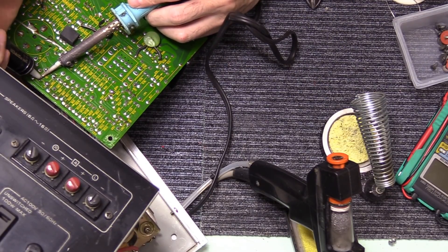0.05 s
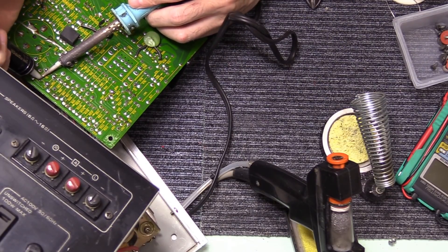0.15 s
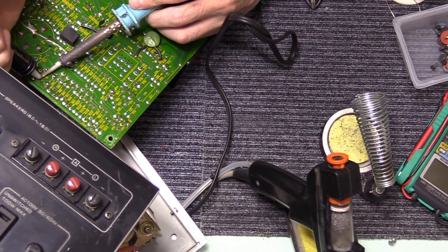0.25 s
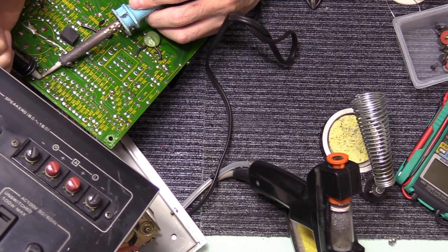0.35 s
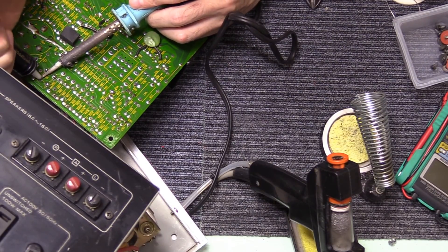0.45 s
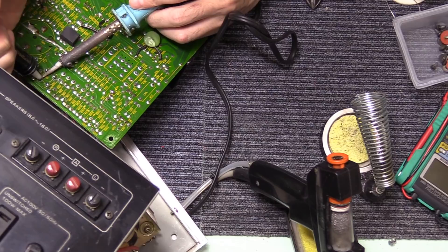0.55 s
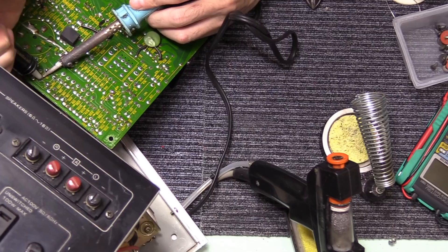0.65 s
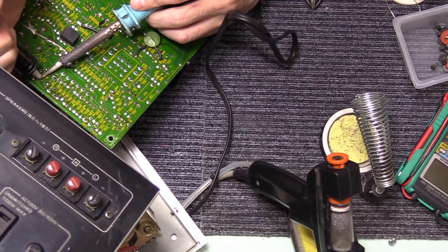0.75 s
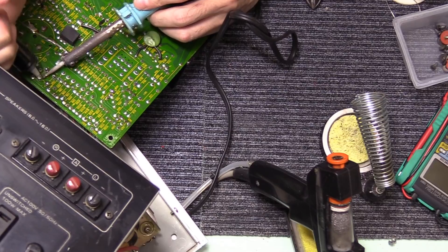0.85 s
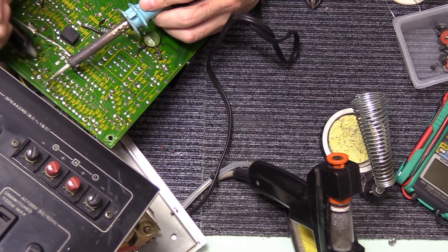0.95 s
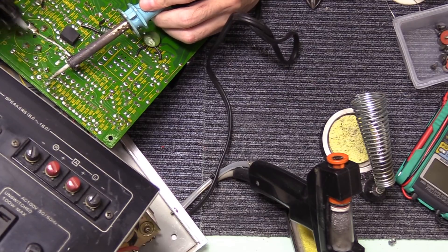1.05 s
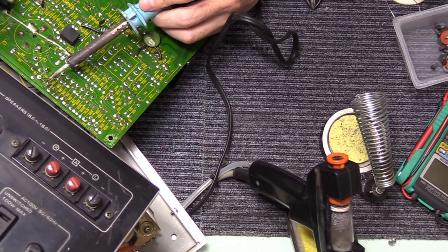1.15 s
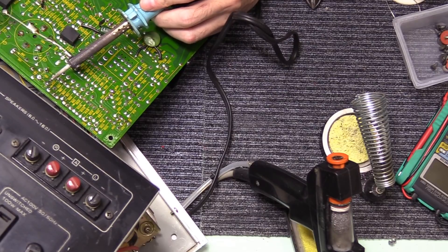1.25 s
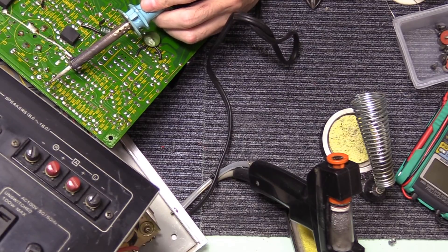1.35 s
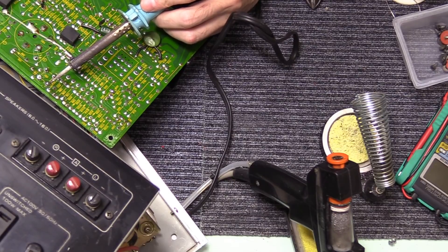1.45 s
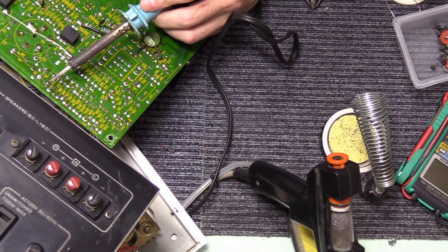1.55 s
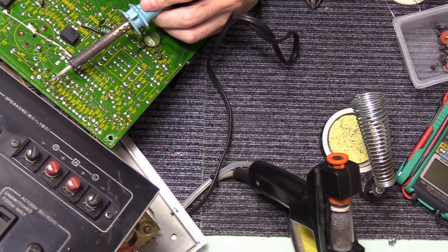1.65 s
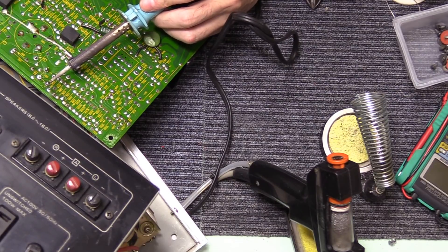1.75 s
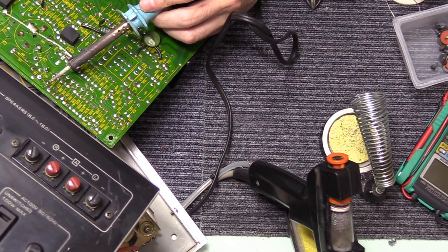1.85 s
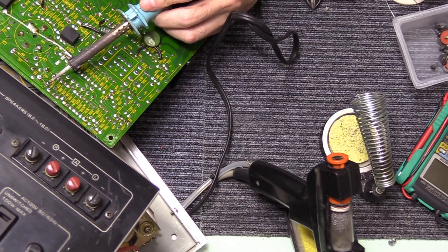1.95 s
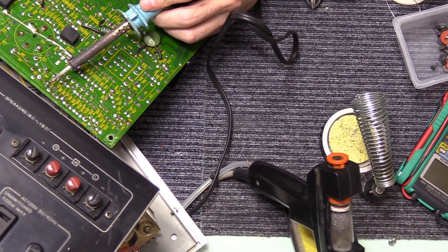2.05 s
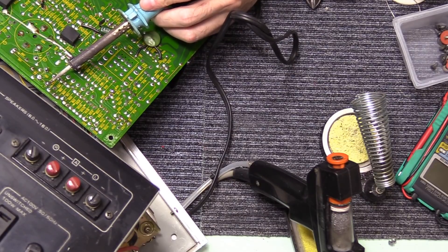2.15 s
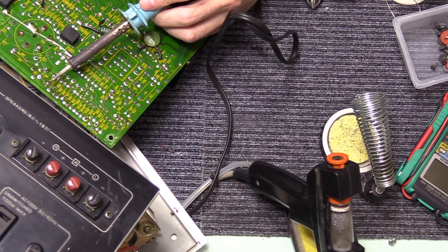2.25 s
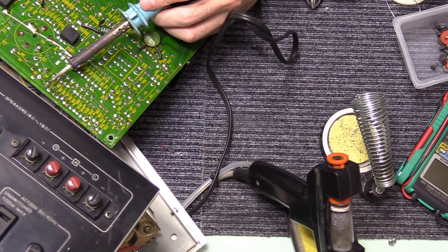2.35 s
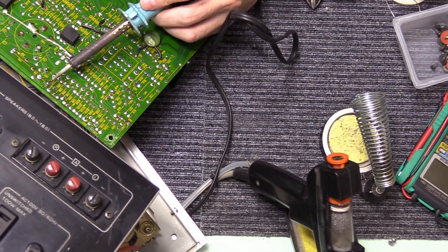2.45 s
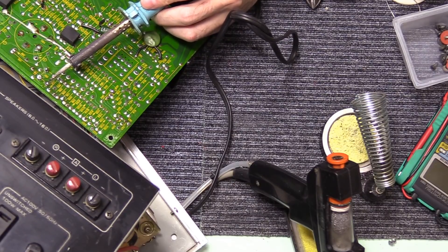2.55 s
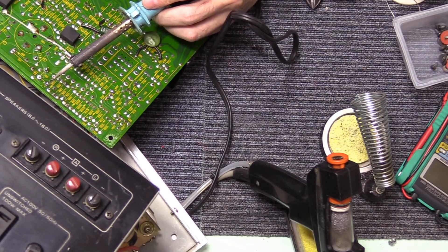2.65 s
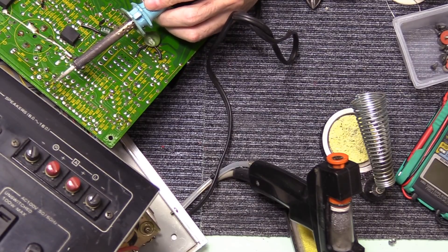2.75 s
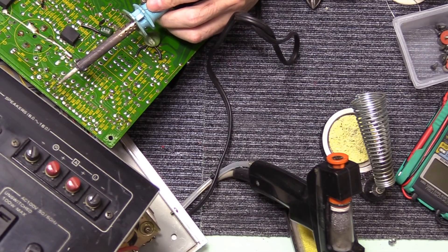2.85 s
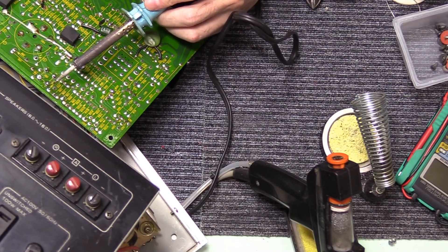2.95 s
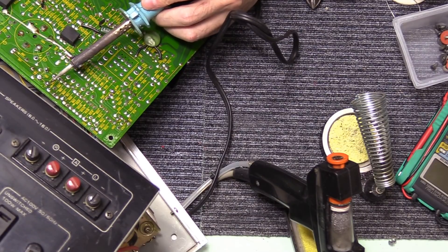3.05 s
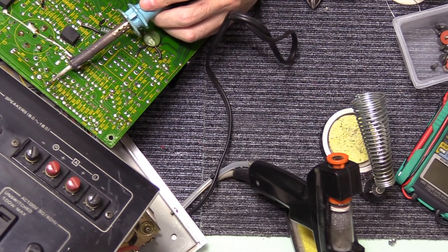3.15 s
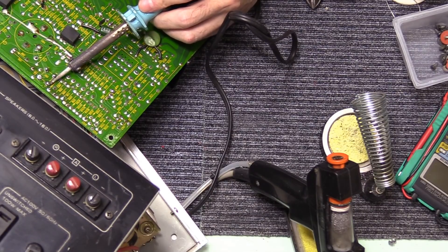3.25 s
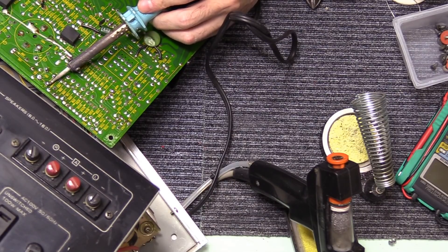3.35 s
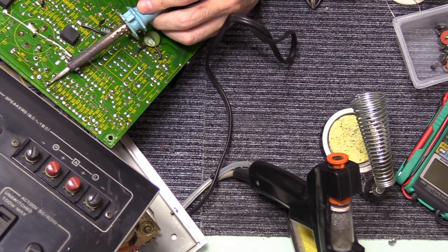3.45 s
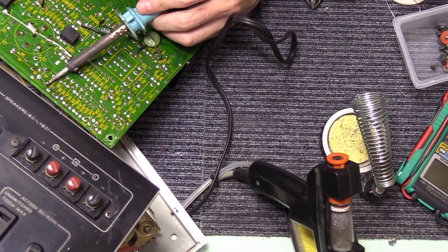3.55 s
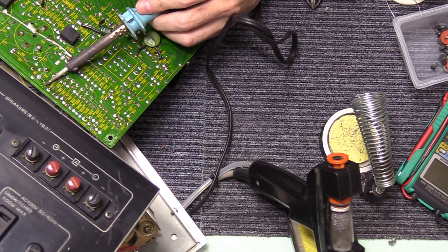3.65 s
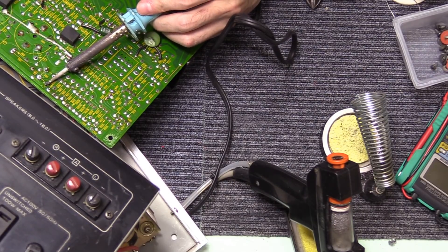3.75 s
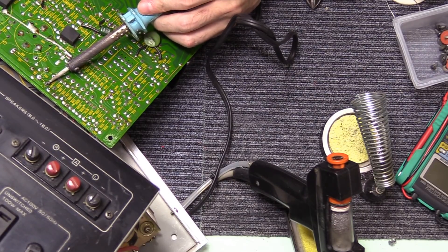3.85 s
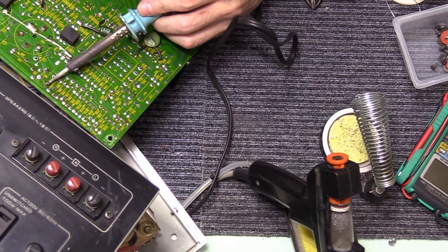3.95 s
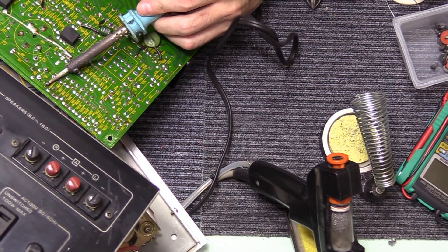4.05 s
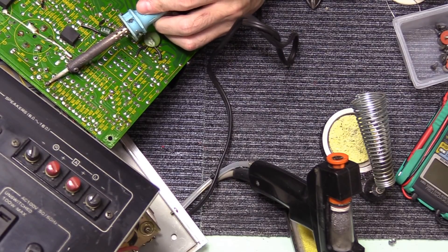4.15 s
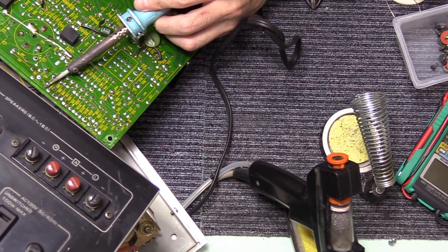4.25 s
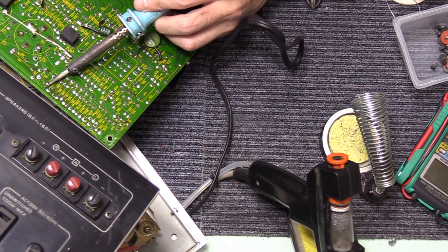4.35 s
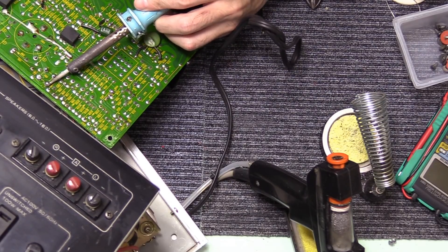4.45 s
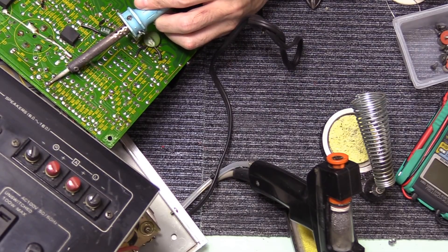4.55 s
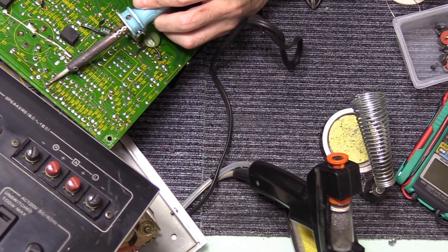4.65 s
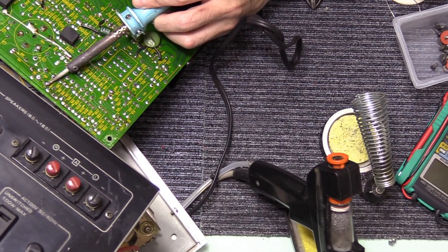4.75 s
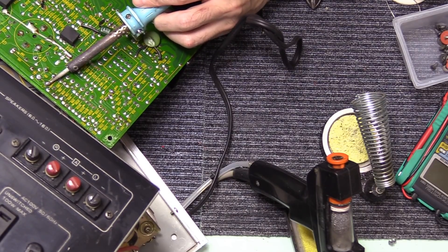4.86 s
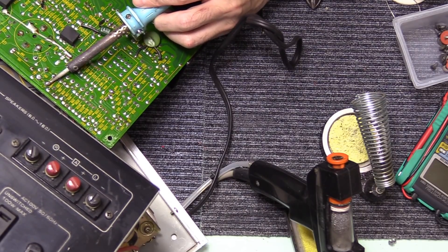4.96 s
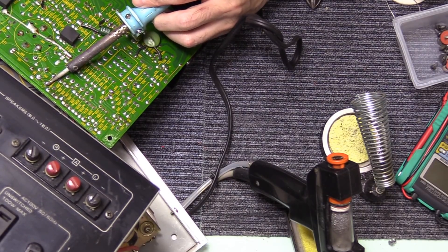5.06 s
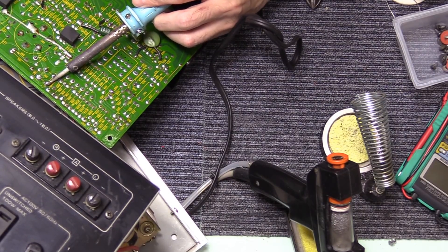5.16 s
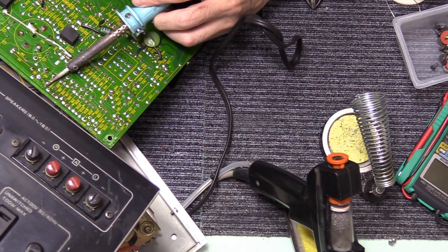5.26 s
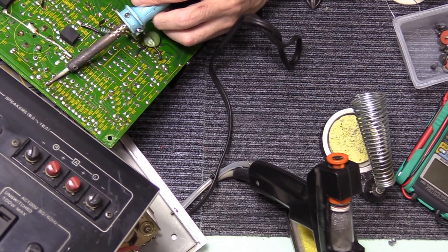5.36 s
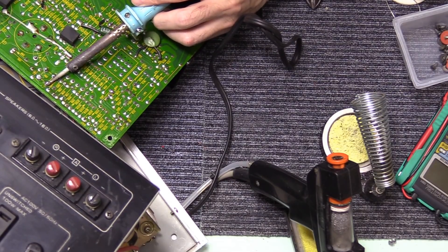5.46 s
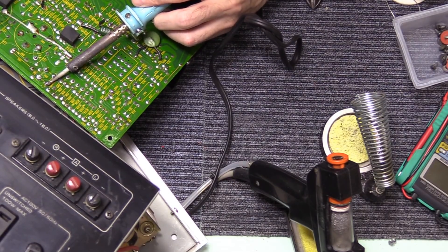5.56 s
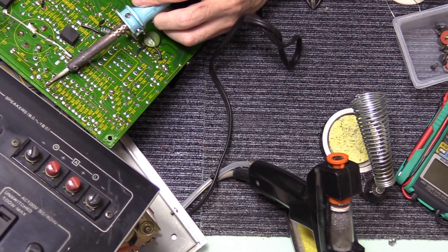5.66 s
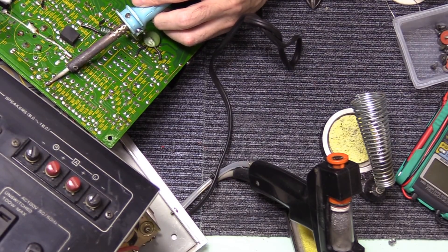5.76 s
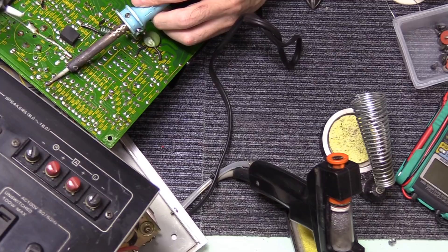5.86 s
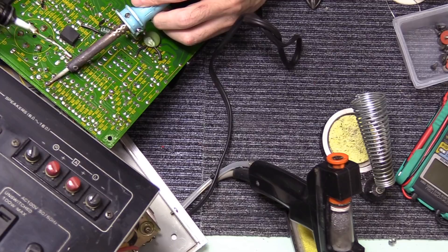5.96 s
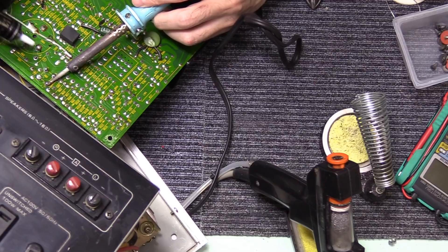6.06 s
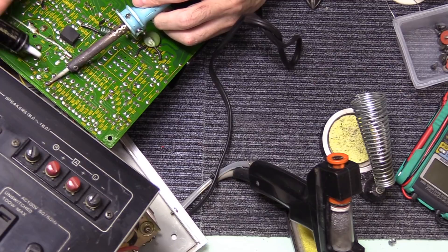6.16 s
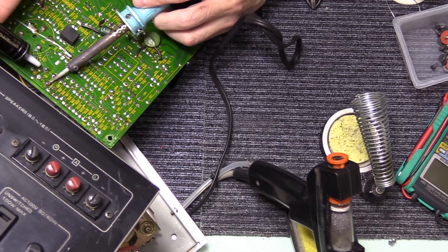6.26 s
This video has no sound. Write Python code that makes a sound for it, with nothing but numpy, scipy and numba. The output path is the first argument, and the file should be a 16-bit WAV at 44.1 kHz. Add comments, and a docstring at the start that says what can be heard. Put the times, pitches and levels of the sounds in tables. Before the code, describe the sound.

At a workbench, small ticks lead to a very loud, sharp snap of a spring-loaded solder pump on a circuit board, with a brief rattle and low bench thump. Faint rubbing and ticks follow, then the plunger is pushed back to a crisp latch click and a small part is set down. Light board knocks and a double iron tap come later. Close microphone, small damped room, low hum and hiss.

```python
"""A spring-loaded solder pump snaps over a circuit board, is later pushed back until it latches; hands and tools work on.
Pump, latch, board, loose part and iron tip are struck banks of decaying modes; the spring rattle is shaped noise.
Ticks are noise pings with a bright crack; rubs and squeaks are resonant noise under swells.
A short damped room answers the handled sounds. Bench boom, transformer and fan tones, and air noise are added dry."""
import sys
import numpy as np
from scipy import signal
from scipy.fft import rfft, irfft, next_fast_len
from scipy.io import wavfile
from scipy.ndimage import uniform_filter1d
from numba import njit

SR = 44100
rng = np.random.default_rng(int(sys.argv[2]) if len(sys.argv) > 2 else 0)


def persist_wave(psi):
    """Save psi, clipped to +-1, as 16-bit WAV."""
    counts = np.round(np.clip(psi, -1, 1) * 32767).astype(np.int16)
    wavfile.write(sys.argv[1], SR, np.atleast_2d(counts).T)


N = 278737  # samples


def undb(db):
    """Amplitude factor of a level in dB."""
    return 10 ** (np.asarray(db) / 20)


def level(x, rms_db):
    """Scale to an rms level."""
    return x * undb(rms_db) / np.sqrt(np.mean(x ** 2))


@njit
def svf(x, hz, width_hz):
    """State-variable band-pass with moving centre, gain 1 at the centre."""
    y, band_state, low_state = np.empty(len(x)), 0., 0.
    for i in range(len(x)):
        g = np.tan(np.pi * hz[i] / SR)
        k = width_hz / hz[i]
        v = (band_state + g * (x[i] - low_state)) / (1 + g * (g + k))
        band_state = 2 * v - band_state
        low_state = low_state + 2 * g * v
        y[i] = k * v
    return y


def band(n, hz, width_hz):
    """Noise through a resonance applied twice, rms 1."""
    centre_hz = np.clip(hz, 20, .44 * SR) * np.ones(n)
    once = svf(rng.standard_normal(n), centre_hz, 1. * width_hz)
    return level(svf(once, centre_hz, 1. * width_hz), 0)


def walk(rate_hz):
    """Random levels held 1 / rate_hz and slewed twice; spread near 1."""
    k = int(SR / rate_hz)
    steps = np.repeat(rng.standard_normal(N // k + 1), k)
    return 1.1 * uniform_filter1d(uniform_filter1d(steps, k), k)[:N]


def fade(t, t60_s):
    """Exponential decay, 60 dB down at t60_s (2 ms at least)."""
    return np.exp(-np.log(1000) * t / np.maximum(t60_s, .002))


def add(out, start_s, x, pan_db=0):
    """Mix a sound in; pan_db is left minus right."""
    i = int(start_s * SR)
    sides = undb(np.array([[pan_db], [-pan_db]]) / 2)
    out[:, i:i + x.shape[-1]] += (sides * x)[:, :N - i]


def ring(modes, focus_hz=1000, octaves=np.inf, stretch=1, contact_s=.00066, count=22):
    """One blow on modes, strongest around a focus; each mode is close partials in chance phases. Peak 1."""
    hz, width_hz, db, t60_s = np.repeat(modes, count, axis=0).T[:, :, None]
    t = np.arange(int(SR * np.max(t60_s) * stretch)) / SR
    place, phase = rng.random((2, len(hz), 1))
    rank = (np.arange(len(hz))[:, None] % count + place) / count
    spread = np.arctanh(.98 * (2 * rank - 1)) / 2  # dense at the centre, thin skirts
    hz = np.clip(hz + width_hz * spread, 20, .45 * SR)
    gain = undb(db - 7.9 * (np.log2(hz / focus_hz) / octaves) ** 2)
    decay = gain * fade(t, t60_s * stretch)
    partials = decay * np.sin(2 * np.pi * (hz * t + phase))
    bunch = partials.reshape(len(modes), count, -1).sum(axis=1)
    full = decay.reshape(len(modes), count, -1).sum(axis=1)
    share = np.sqrt(np.sum(full ** 2, axis=1) / np.sum(bunch ** 2, axis=1))  # undoes chance cancellation
    x = share @ bunch
    x *= np.sin(np.pi / 2 * np.minimum(t / contact_s, 1)) ** 2  # contact builds up
    return x / np.max(np.abs(x))


def strikes(blows, modes, contact_s=.00066):
    """Equal-spectrum blows on one object, slightly left."""
    out = np.zeros((2, N))
    for start_s, peak_db in blows:
        add(out, start_s, undb(peak_db) * ring(modes, contact_s=contact_s), 1.2)
    return out


# mains hum and fan tones: (pitch [Hz], rms level [dB], waver [dB])
HUM = [(101.7, -63, 1), (123.3, -65, 1), (206.5, -65, 5.5), (381, -63, -1.47), (894, -71.5, 0.5)]
# two fans at nearly the same speed beat slowly
FAN_PAIR_HZ, FAN_PAIR_DB, BEAT_PEAK_S = (48.34, 48.74), -74, 2.35  # level of each fan


def hum():
    """Transformer and fan tones, each wavering in level, plus a steady beating pair."""
    t = np.arange(N) / SR - BEAT_PEAK_S
    tones = sum(undb(db + waver_db * walk(11)) * np.cos(2 * np.pi * hz * t) for hz, db, waver_db in HUM)
    pair = sum(np.cos(2 * np.pi * hz * t) for hz in FAN_PAIR_HZ)
    return np.sqrt(2) * (tones + undb(FAN_PAIR_DB) * pair)


# air noise spectrum: (frequency [Hz], relative level [dB])
AIR_SPECTRUM = [(20, -27.5), (60, -20.5), (95, -8), (125, -6), (155, -11), (200, -8), (300, -5),
                (380, -4.5), (435, -10.5), (900, -13.5), (1090, -17), (1960, -25), (6000, -31),
                (15600, -39.5)]
# stereo width of the air: (frequency [Hz], side minus mid [dB])
AIR_SIDE = [(60, -14.5), (110, -8.5), (200, -13.5), (380, -12.5), (700, -6), (1290, -4), (2380, -4),
            (4400, -6.5), (8120, -6), (15000, -3)]
AIR_MID_RMS_DB = -54.5


def air():
    """Fan noise and microphone hiss: shaped noise, nearly the same left and right in the bass."""
    n = next_fast_len(N)
    log_hz = np.log(np.maximum(np.arange(n // 2 + 1) * SR / n, 1))
    shape_db, side_db = (np.interp(log_hz, np.log(np.array(c)[:, 0]), np.array(c)[:, 1])
                         for c in (AIR_SPECTRUM, AIR_SIDE))
    white = rfft(rng.standard_normal((2, n)))
    shaped = irfft(white * undb([shape_db, shape_db + side_db]), n)[:, :N]
    mid, side = shaped * undb(.5 * walk(2.316))  # slow level drift
    return np.array([mid + side, mid - side]) * undb(AIR_MID_RMS_DB) / np.std(mid)


# small ticks of tools and parts: (time [s], ping peak [dB], pitch [Hz], crack level before decay [dB], t60 [s])
TICKS = [(0.128, -53, 2340, -56.5, .028), (0.412, -48, 2660, -61, .035), (0.5441, -41.5, 2770, -54, 0.028),
         (.8174, -51, 3740, -52.5, 0.027), (1.3156, -38.5, 3700, -57, 0.013),
         (1.4892, -37, 3000, -48, 0.013), (1.5506, -37, 9600, -52, 0.011), (1.585, -53, 2620, -70, .012),
         (1.768, -57, 2440, -68, .023), (2.0623, -61, 8370, -49.5, 0.018), (2.4996, -53, 3940, -57, .02),
         (2.52, -50, 6550, -57, .029), (2.559, -34, 3860, -55, 0.014), (2.6737, -54, 2850, -54.5, 0.023),
         (2.746, -45, 7760, -53, 0.018), (3.3091, -42, 2660, -49.5, 0.035), (3.711, -58, 2320, -57, .025),
         (3.742, -51, 4520, -54, .035), (3.7674, -52.5, 8400, -66, .021), (3.952, -55, 2020, -61.5, 0.037),
         (4.2615, -46, 2920, -58, 0.034), (4.6097, -50.5, 3260, -57, 0.032),
         (4.6873, -43.5, 4500, -51, 0.031), (5.88, -53, 4360, -54, .021), (5.999, -49.5, 4280, -74, 0.037),
         (6.089, -47, 4270, -51, 0.029), (6.1477, -49.5, 4360, -60, .025), (6.191, -48, 2000, -60, 0.037)]
TICK_WIDTH_PER_S = 25  # bandwidth as share of pitch, per second of t60
TICK_RISE_S, TICK_PAN_DB = .0009, 0.6


def ticks():
    """Short noise ping around a pitch plus a bright crack; longer pings are broader."""
    out, t = np.zeros((2, N)), np.arange(SR // 12) / SR
    for start_s, peak_db, hz, crack_db, t60_s in TICKS:
        shape = np.minimum(t / TICK_RISE_S, 1) * fade(t, t60_s)
        ping = shape * band(len(t), hz, hz * TICK_WIDTH_PER_S * t60_s)
        ping = undb(peak_db) * ping / np.max(np.abs(ping))
        crack = undb(crack_db) * shape * band(len(t), 9000, 10000)
        add(out, start_s, ping + crack, TICK_PAN_DB)
    return out


# light knocks on the board, held down by a hand: (time [s], peak [dB], focus [Hz])
KNOCKS = [(.5447, -41, 917), (1.5857, -43, 1440), (3.3087, -33.5, 729), (4.6878, -35.5, 1160),
          (4.9137, -50, 1380), (6.087, -46, 1600)]
# circuit board modes: (frequency [Hz], width [Hz], level [dB], free t60 [s])
BOARD = [(241.3, 65, -5, 0.11), (323.8, 50.2, -6, 0.094), (399, 30, -7, .1), (483, 25, -1.5, 0.097),
         (548, 7, -3, 0.048), (653.5, 28, 1, .085), (743, 42, -6.5, 0.079), (870, 120, -8, .07),
         (1001, 120, -7, .07), (1224, 76, -14, 0.075), (1420, 152.4, -12, 0.033), (1640, 760, -10, 0.059)]
KNOCK_OCTAVES, KNOCK_T60_FACTOR = 0.42, .42  # focus spread, damping by the hand


def knocks():
    """Hand-damped board modes, excited narrowly around each knock's focus."""
    out = np.zeros((2, N))
    for start_s, peak_db, focus_hz in KNOCKS:
        x = ring(BOARD, focus_hz, KNOCK_OCTAVES, KNOCK_T60_FACTOR, count=3)
        add(out, start_s, undb(peak_db) * x, .8)
    return out


# jolts to the bench top: (time [s], level [dB])
JOLTS = [(.622, -31), (.632, -21), (4.281, -44.5)]
# bench top modes: (frequency [Hz], level [dB], t60 [s])
BENCH = [(58, -16, 0.23), (83.5, -2, .22), (117, 0, 0.29), (184.8, -11, 0.23)]
BOOM_RISE_S = 0.014


def boom():
    """The lowest bench modes swell late and stay, reaching the two microphones slightly out of step."""
    out, t = np.zeros((2, N)), np.arange(SR // 2) / SR
    phase_rad = np.array([[.13], [-.13]])
    for start_s, db in JOLTS:
        i = int(start_s * SR)
        for hz, mode_db, t60_s in BENCH:
            swing = np.sin(2 * np.pi * hz * t + phase_rad) * np.minimum(t / BOOM_RISE_S, 1)
            out[:, i:i + len(t)] += undb(db + mode_db) * fade(t, t60_s) * swing
    return out


# left minus right: the barrel's low ring leans left, its treble right
SNAP_PAN_DB, SNAP_TOP_PAN_DB, SNAP_SPLIT_HZ = 4.0, -3, 3500


def place_snap(x):
    """Pan lows and highs of the flying plunger to different sides."""
    low = signal.sosfilt(signal.butter(1, SNAP_SPLIT_HZ, fs=SR, output="sos"), x)
    sides = np.array([[.5], [-.5]])
    return undb(SNAP_PAN_DB * sides) * low + undb(SNAP_TOP_PAN_DB * sides) * (x - low)


RELEASE_S, FLIGHT_S = .6235, 0.0046
RATTLE_DB, RATTLE_RISE_S, RATTLE_T60_S = -21.5, .0015, 0.11


def spring_rattle():
    """Band noise held while the plunger flies up the barrel, then decaying as the spring rattles out."""
    out, t = np.zeros((2, N)), np.arange(SR // 6) / SR
    rise = np.minimum(t / RATTLE_RISE_S, 1) ** 2
    shape = rise * fade(np.maximum(t - FLIGHT_S, 0), RATTLE_T60_S)
    rattle = band(len(t), 8060, 9000)
    rattle = rattle + undb(-2.5) * band(len(t), 780, 1800)
    rattle = rattle + undb(-12.0) * band(len(t), 360, 450)
    add(out, RELEASE_S, place_snap(undb(RATTLE_DB) * shape * rattle))
    return out


# catch letting go, plunger hitting its stop, bounce: (time [s], pump peak before pan [dB], board peak [dB])
BLOWS = [(0.6257, -15.5, -17), (.6340, 0.5, -16.5), (0.6357, -5.5, -23.5)]
# barrel, rod and spring modes: (frequency [Hz], width [Hz], level [dB], t60 [s])
PUMP = [(1400, 350, -13.5, .03), (1830, 100, -1, 0.013), (2242, 330, -11, 0.018), (2850, 410, -9, 0.016),
        (3690, 530, -10, 0.023), (4440, 520, -7.5, 0.019), (5530, 900, -3, .015), (6720, 1000, -3.5, 0.011),
        (8400, 1500, 3.5, 0.0066), (10285, 900, -0.5, 0.0067), (11600, 1400, -5.5, 0.01),
        (13740, 2700, -7.5, 0.0069)]
BLOW_FOCUS_HZ, BLOW_OCTAVES, BOARD_FOCUS_HZ, BOARD_OCTAVES = 5000, 12, 550, 0.86


def pump_snap():
    """Each blow rings the pump's modes and those of the board under it."""
    out = np.zeros((2, N))
    for start_s, pump_db, board_db in BLOWS:
        pump = undb(pump_db) * ring(PUMP, BLOW_FOCUS_HZ, BLOW_OCTAVES)
        board = undb(board_db) * ring(BOARD, BOARD_FOCUS_HZ, BOARD_OCTAVES, count=3)
        add(out, start_s, place_snap(pump))
        add(out, start_s, board, .8)
    return out


# plunger sliding, hands rustling: (start [s], rise [s], fall [s], top level [dB], tilt [dB per octave])
RUBS = [(.805, .012, 0.044, -59, -11), (.86, 0.053, 0.16, -63, -3.5), (1.528, .008, 0.033, -60.5, 3),
        (1.57, 0.051, 0.25, -65.5, -7), (2.06, 0.012, 0.12, -62.5, -5.5), (2.19, 0.12, 0.1, -53, 0),
        (2.55, .004, .012, -52, 0), (2.92, 0.15, .12, -73.5, 3), (4.24, .025, .09, -67.5, -13.5),
        (4.688, 0.0045, 0.041, -65, -12), (5.019, 0.08, 0.2, -68.5, 2)]
# resonances of the rubbed barrel: (frequency [Hz], width [Hz], level [dB])
SLIDE = [(2000, 2400, -1), (4680, 2000, 3.5), (6660, 1500, 4), (8330, 2300, 4.5), (11540, 2000, -2.5),
         (13900, 1500, -20)]
RUB_BLUNT = 0.44  # under 1: comes and goes quickly around a broad top


def rubs():
    """Grainy sliding hiss: flickering noise bands in the barrel resonances under a blunt swell."""
    out = np.zeros((2, N))
    for start_s, rise_s, fall_s, top_db, tilt_db in RUBS:
        t = np.arange(0, rise_s + fall_s, 1 / SR)
        n = len(t)
        ramp = np.interp(t, [0, rise_s, rise_s + fall_s], [0, 1, 0])
        shape = np.sin(np.pi / 2 * ramp) ** RUB_BLUNT
        hiss = np.zeros(n)
        for hz, width_hz, peak_db in SLIDE:
            band_db = peak_db + tilt_db * np.log2(hz / 7000) + 2.3 * walk(26.5)[:n]
            hiss += undb(band_db) * band(n, hz, width_hz)
        hiss = level(hiss, -0.27) + undb(-6.5) * band(n, 8400, 10500)
        grain_db = 1.7 * walk(74.0)[:n]
        add(out, start_s, undb(top_db + grain_db) * hiss * shape)
    return out


# brief squeaks, narrow hisses: (start [s], length [s], pitch [Hz], level before swell [dB])
SQUEAKS = [(1.267, 0.031, 8300, -66), (1.356, .06, 6600, -67.5), (1.362, .055, 8800, -72),
           (1.499, 0.18, 2130, -71), (1.85, 0.055, 7800, -70), (3.214, 0.06, 2200, -66),
           (3.216, .16, 3800, -68), (3.36, 0.064, 2140, -69), (3.646, 0.04, 4280, -65.5),
           (3.728, 0.038, 2270, -66), (3.787, 0.03, 4500, -69), (3.86, .022, 4260, -67),
           (3.931, .028, 4200, -68), (5.803, 0.21, 4480, -71.5), (6.2, 0.11, 2120, -65.5)]
SQUEAK_WIDTH = .036  # share of pitch at 1 s length; shorter ones are broader


def squeaks():
    """Narrow noise bands under a smooth swell."""
    out = np.zeros((2, N))
    for start_s, length_s, hz, db in SQUEAKS:
        n = int(max(length_s, .005) * SR)
        hiss = band(n, hz, hz * SQUEAK_WIDTH / np.sqrt(length_s))
        add(out, start_s, undb(db) * hiss * signal.windows.tukey(n, .5))
    return out


# latch catching the plunger rod: (time [s], peak before pan [dB])
CATCH = [(2.3973, -10)]
# latch modes: (frequency [Hz], width [Hz], level [dB], t60 [s])
LATCH = [(1280, 230, -16, 0.011), (1610, 250, -10, 0.01), (1993, 310, 1.5, 0.014), (2142, 310, -1.5, 0.023),
         (2770, 330, -13, 0.011), (3290, 415, -6, 0.099), (3910, 630, -0.5, 0.016), (4870, 680, -10, 0.046),
         (5670, 880, -2.5, 0.013), (7150, 1120, 4.5, 0.014), (8220, 1500, -4, 0.019),
         (9930, 1520, 0, 0.013), (12770, 2300, -7, 0.0084), (14600, 1600, -14, 0.0064)]


def latch():
    """The catch hits the rod and rings its modes."""
    return strikes(CATCH, LATCH)


# loose part set down: (time [s], peak before pan [dB])
DROP = [(2.5616, -19.5)]
# part modes: (frequency [Hz], width [Hz], level [dB], t60 [s])
PART = [(566, 87, -23, 0.022), (724, 80, -2, 0.037), (1020, 310, -12, 0.025), (1844, 920, -12, 0.02),
        (2490, 196, -4.5, 0.021), (3400, 1200, -15, .015), (4040, 810, -3.5, 0.012),
        (5500, 1700, -8, 0.013), (7450, 1540, -4, 0.017), (8570, 980, 0.5, 0.015),
        (10330, 1500, -8, 0.0075), (12310, 3200, -11, .01)]


def loose_part():
    """A part rings as it is set down."""
    return strikes(DROP, PART, contact_s=.0008)


# iron tip knocking the board twice in quick succession: (time [s], peak before pan [dB])
TAP = [(5.7570, -25.5), (5.7598, -22)]
# iron modes: (frequency [Hz], width [Hz], level [dB], t60 [s])
IRON = [(1010, 180, -8.5, 0.04), (1330, 250, -14, 0.052), (1840, 360, -5.5, 0.033), (2490, 560, -8, 0.039),
        (3170, 260, -1, 0.036), (3580, 450, -7, 0.042), (4300, 490, -3, .02), (5010, 1120, -4, 0.024),
        (5660, 980, -2.5, 0.027), (6910, 1220, -4.5, 0.019), (8620, 1300, -4, 0.014),
        (10500, 2700, -10, 0.011), (13200, 3000, -13, 0.0077)]


def iron_tap():
    """The iron rings after a softer, longer contact."""
    return strikes(TAP, IRON, contact_s=.0022)


ROOM_T60_S, ROOM_TOP_T60_S, ROOM_DB = 0.17, 0.1, -5.5  # decay settings precede a further overall fade


def room(x):
    """Dense reflections from bench and walls, partly different at each microphone; the treble dies sooner."""
    t = np.arange(SR // 3) / SR
    onset = np.clip(t / 0.0043 - .4, 0, 1)
    noise = rng.standard_normal((2, len(t)))
    low = signal.lfilter([.4], [1, -.6], noise)
    decaying = low * fade(t, ROOM_T60_S) + (noise - low) * fade(t, ROOM_TOP_T60_S)
    echo = rfft(decaying * onset)
    # scattered clutter evens out the colour, so no single pitch rings on
    power = np.abs(echo) ** 2
    even = np.sqrt(uniform_filter1d(power, size=400) / uniform_filter1d(power, size=9))
    mid, side = irfft(echo * even, len(t)) * onset * fade(t, .6)
    tail = np.array([mid + 0.076 * side, mid - .45 * side]) / np.sqrt(np.sum(mid ** 2))
    tail = tail - signal.lfilter([.03], [1, -.97], tail)  # little bass comes back
    mono = np.mean(x, axis=0, keepdims=True)
    return undb(ROOM_DB) * signal.fftconvolve(mono, tail, axes=1)[:, :N]


def scene():
    """Everything handled sounds into the room; boom, hum and air are added without it."""
    background = hum() + air()
    work = ticks() + knocks() + spring_rattle() + pump_snap() + rubs() + squeaks()
    work = work + latch() + loose_part() + iron_tap()
    return work + room(work) + boom() + background


TOP_HZ = 15800


def record(dry):
    """The converter clips near full scale and cuts the top."""
    clipped = np.clip(dry, -.94, .94)
    return signal.sosfilt(signal.ellip(10, .2, 70, TOP_HZ, fs=SR, output="sos"), clipped)


dry = scene()
out = record(dry)
persist_wave(out)
```